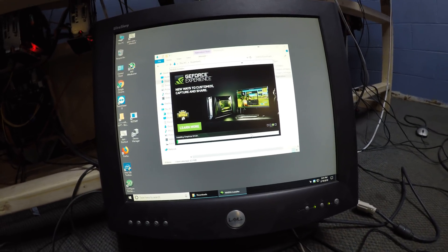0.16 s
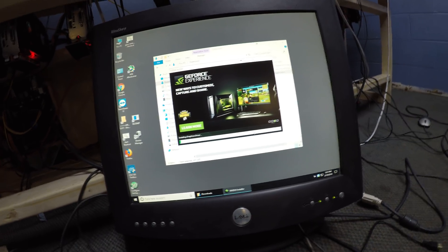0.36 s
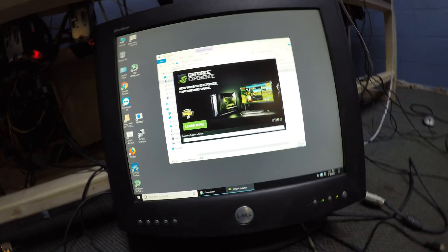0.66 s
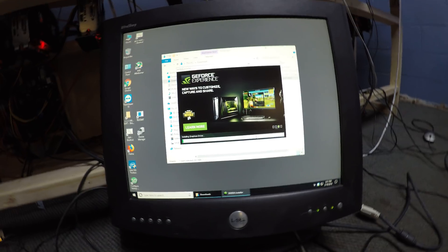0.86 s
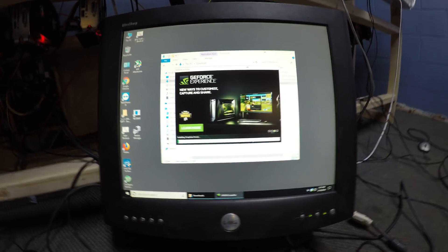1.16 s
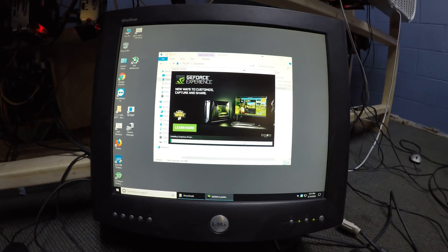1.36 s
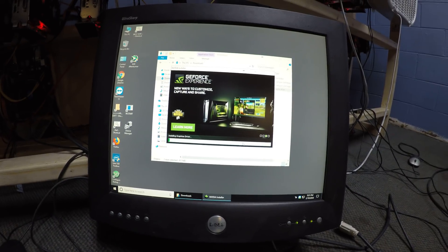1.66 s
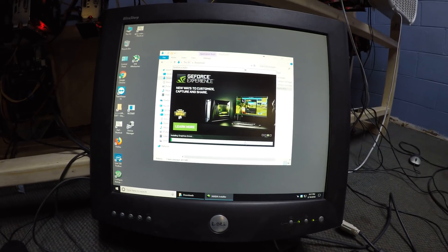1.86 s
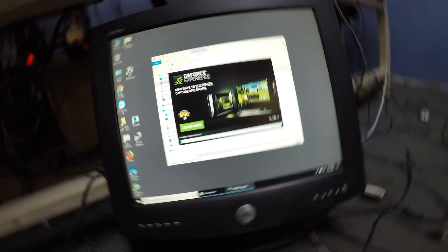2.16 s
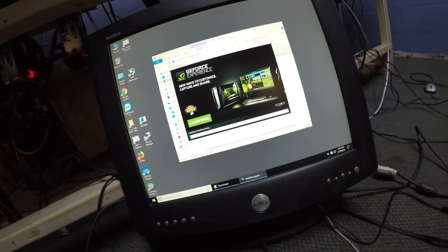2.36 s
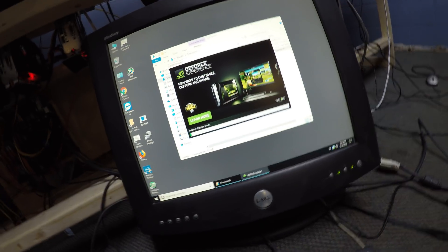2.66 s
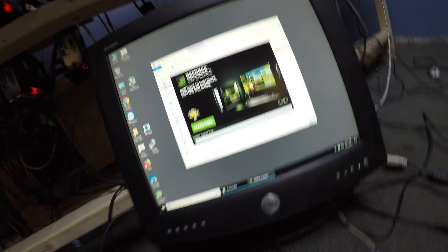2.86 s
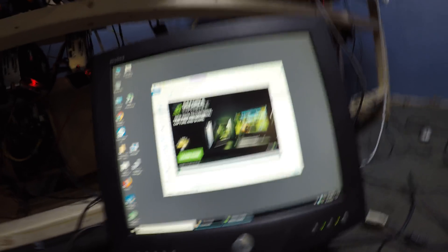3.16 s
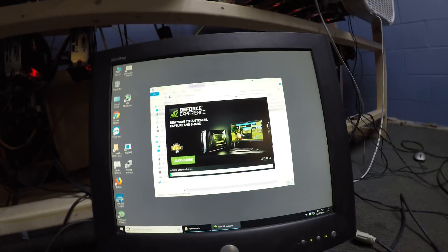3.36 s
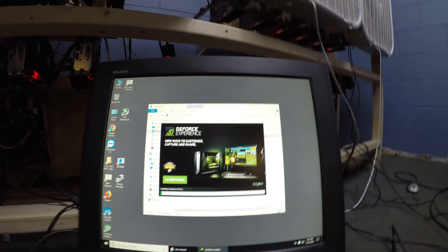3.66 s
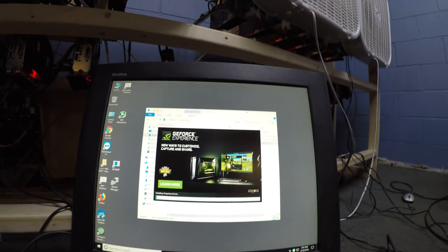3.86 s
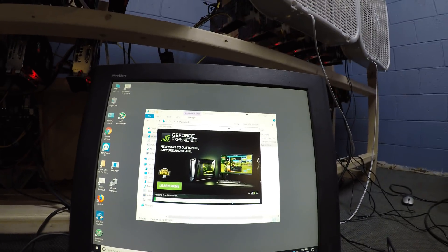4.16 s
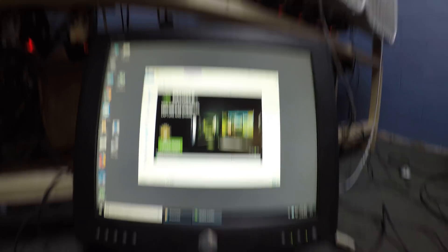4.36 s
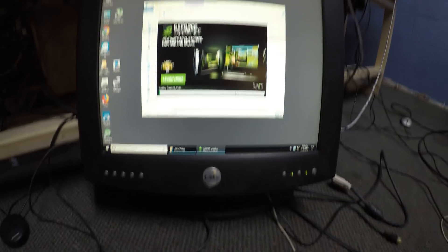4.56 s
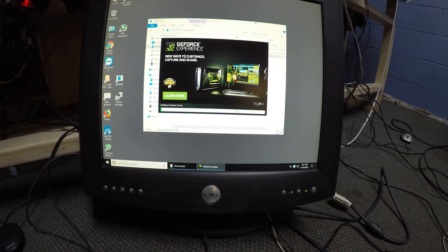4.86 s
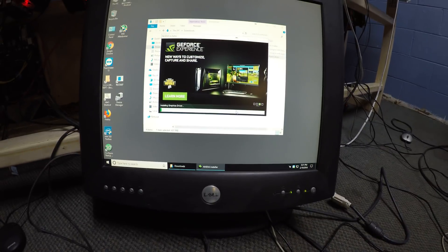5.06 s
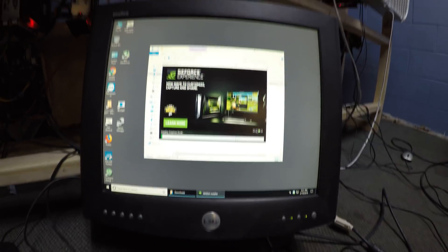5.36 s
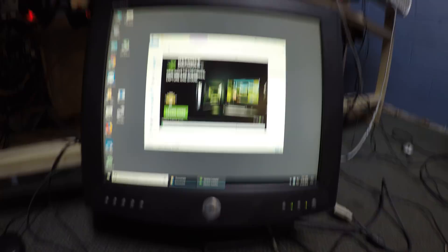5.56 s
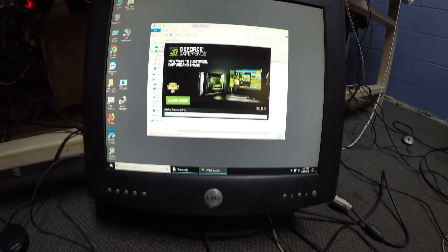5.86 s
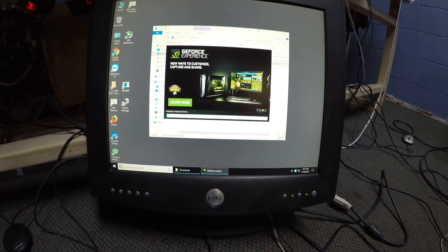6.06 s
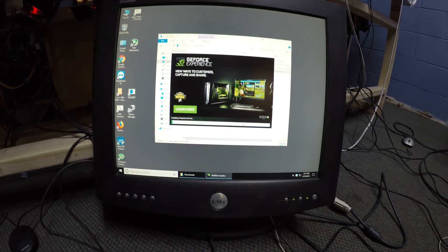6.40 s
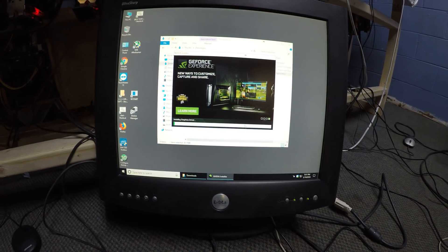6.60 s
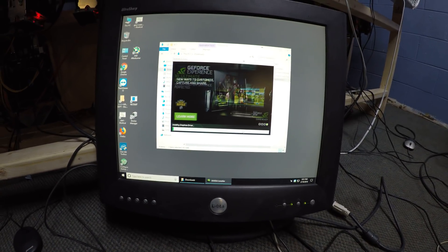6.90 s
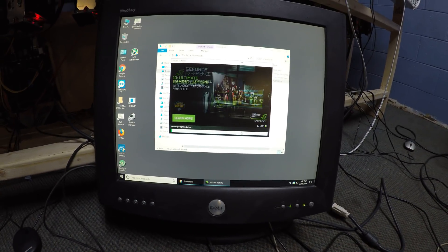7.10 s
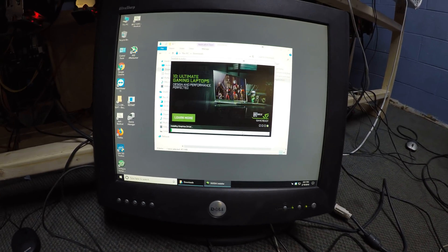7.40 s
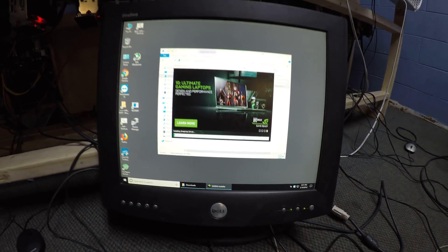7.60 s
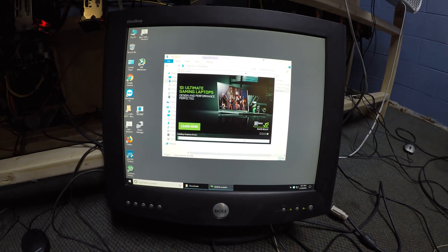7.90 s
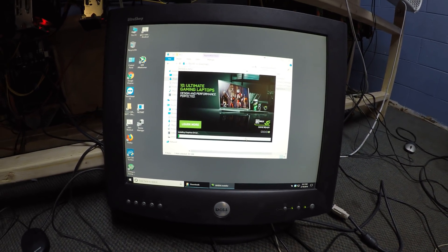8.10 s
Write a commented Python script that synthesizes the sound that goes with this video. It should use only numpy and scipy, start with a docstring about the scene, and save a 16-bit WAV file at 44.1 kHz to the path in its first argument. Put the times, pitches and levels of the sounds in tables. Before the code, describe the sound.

From 0 to about 8.2 seconds, many computer cooling fans and large box fans run constantly in a hard-walled room. A low hum, strongest around 70 to 150 hertz, beats and throbs gently under a smooth, slightly breathing roar. Over it lies a steady, bright rush of air through narrow passages. Four small fans whine thinly, with fundamentals near 1.5 to 2 kilohertz and higher multiples around 4 to 6 kilohertz, swelling, fading and bending slightly in pitch. A small handheld device picks this up nearly identically on both sides, with faint separate top hiss. Brief, dull handling bumps fall near 1.3, 1.8 (weakest), 2.9, 3.2, 3.5, 3.7, 4.8, 5.6 and 6.0 seconds, the last two strongest. Afterwards only fan noise remains, ending without any slowdown.

```python
"""A rack of computers and box fans in a hard-walled room, heard by two ports of a small hand-held device.
From start to end big blades hum as beating sines, and air roars and rushes as shaped noise;
four small fast fans whine as multiples of rotor speeds that rise and fall throughout.
Between 1.3 and 6 s the hand bumps the housing nine times, each a quick push and a weaker swing back.
Each port adds its own faint top hiss of shaped noise all along."""
import sys
import numpy as np
from scipy import signal
from scipy.fft import rfft, irfft, next_fast_len
from scipy.io import wavfile
from scipy.ndimage import uniform_filter1d

SR = 44100
rng = np.random.default_rng(int(sys.argv[2]) if len(sys.argv) > 2 else 0)


def volts(x):
    """Linear amplitude factor 10**(x/20) for a level x in dB, scalar or array-like."""
    e = np.asarray(x, float) / 20
    return 10 ** e


def unload_wav(signal):
    """Save mono or channel-first audio to the path in sys.argv[1] as 16-bit WAV at rate SR, clipped to [-1, 1]."""
    wavfile.write(
        sys.argv[1],
        SR,
        np.round(np.clip(np.atleast_2d(signal).T, -1, 1) * 32767).astype(np.int16),
    )


N = 363384

# small whining fans, by name: rest_hz, settling_s, louder_db_per_hz of speed-up
ROTORS = {"a": (2010.2, .28, 0), "b": (1927.7, .2, 0), "c": (1524, .26, -.75), "d": (1873, .15, 0)}


def time():
    """Uniform sampling: the instant of every sample in seconds."""
    return np.arange(N) / SR


def walk(rate):
    """Slow random modulation: levels held 1 / rate s, smoothed by two running means; spread near 1."""
    hold = max(int(SR / rate), 1)
    steps = np.repeat(rng.standard_normal(N // 500), hold)[:N + hold]
    once = uniform_filter1d(steps, hold)
    return 1.3 * uniform_filter1d(once, hold)[:N]


def tone(hz):
    """Frequency modulation: phase is the running sum of a pitch curve; a sine of rms 1."""
    turns = np.cumsum(hz) / SR + rng.random()
    return np.sqrt(2) * np.sin(2 * np.pi * turns)


def colour(hz, density_db, resonances=()):
    """Spectral shaping: white noise is given a density in dB per Hz, lifted or cut at each resonance."""
    size = next_fast_len(N)
    f = np.maximum(np.arange(size // 2 + 1) * SR / size, 1)
    lift_db = sum(db / (1 + (2 * (f - centre) / width) ** 2) for centre, width, db in resonances)
    shape_db = np.interp(np.log(f), np.log(hz), density_db) + lift_db
    gain = volts(shape_db) * np.sqrt(SR / 2)  # white noise spreads its power over SR / 2
    return irfft(rfft(rng.standard_normal(size)) * gain, size)[:N]


def hum():
    """Beating: close tones interfere, while each drifts a little in speed and swells as the inflow shifts."""
    # steady tones of big fan shafts, blades and mains: pitch_hz, level_db
    tones = [(46.8, -56), (58.9, -53.5), (71.3, -44.5), (72.7, -44), (77.7, -47), (117.8, -44.5),
             (120, -42.5), (143, -43), (145.3, -38), (154.8, -48), (197.8, -48.5), (235.5, -54),
             (239.9, -52.5), (303.8, -52), (304.8, -53), (308.9, -55), (360, -63), (385.6, -58.5),
             (387.9, -63), (418.9, -68), (935, -70)]
    total = np.zeros(N)
    for pitch_hz, level_db in tones:
        swell = volts(level_db + 2.32 * walk(4))
        drift = 1 + 0.002023 * walk(2.5)
        total += swell * tone(pitch_hz * drift)
    return total


def roar():
    """Turbulence: the flow of many big fans sums to a smooth low noise that breathes in level."""
    # low roar, lifted by room modes: frequency_hz, density_db per Hz
    roar_curve = [(15, -61), (60, -61), (100, -60), (113, -55.5), (146, -50.5), (165, -61), (190, -59.5),
                  (212, -53.5), (228, -64.5), (240, -60.5), (253, -70), (285, -63), (335, -71),
                  (400, -70.5), (450, -81), (520, -91.5)]
    noise = colour(*np.transpose(roar_curve + [(700, -130)]))
    return noise * volts(0.36 * walk(2.59))


def rush():
    """Turbulence in narrow passages: duct resonances and echo dips colour noise steadier than the roar."""
    # small fans and fins, with dips of nearby echoes: frequency_hz, relative_density_db per Hz
    rush_curve = [(260, -31), (450, -12.5), (494, -9.5), (558, -19), (802, -8), (1110, -18.5), (1250, -9),
                  (1430, -5), (1490, -3.5), (1730, -11), (1980, -11), (3340, -15.5), (4430, -6), (5870, -6),
                  (6280, -10), (7480, -25.5), (11200, -35.5), (14600, -64), (22000, -120)]
    # small resonances and dips of ducts and fins: centre_hz, width_hz, lift_db
    ducts = [(474, 41, 4), (540, 38, -5.5), (580, 30, -4), (625, 69, 2.5), (950, 73, 2), (1040, 60, -3),
             (1136, 50, -4), (2550, 1400, 1), (3520, 220, -2.5), (4240, 90, 0.5), (4500, 130, 1),
             (4960, 110, 3), (5400, 200, 2), (6080, 130, 2), (6380, 160, 4.5)]
    noise = colour(*np.transpose(rush_curve), ducts)
    level_db = -39 + .25 * walk(1.5)
    return noise / noise.std() * volts(level_db)


def speed_up(fan):
    """Rotor inertia: pitch in Hz over rest follows each change of drive, and its end, with an exponential lag."""
    # spells of faster or slower drive, by fan: start_s, length_s, pitch_change_hz aimed at
    spells = {"a": [(-1, 1, 14), (1.8, .24, 23), (3.85, .33, 19), (5.33, .58, 21)], "b": [(-1, 1.25, 7.5),
              (1.35, .45, 8), (5.25, 3.1, 12)], "c": [(1.72, .62, -7.5), (3.35, .65, -2.5), (4.0, .3, -7),
              (5.5, .4, -6), (5.9, .3, -4.5), (6.2, .52, -6), (7.2, 1.1, 1)], "d": [(-1, 2.05, 10),
              (3.5, .45, 31), (3.95, .55, 15), (4.65, .65, -13)]}
    settling_s = ROTORS[fan][1]

    def follow(start_s):
        return 1 - np.exp(-np.maximum(time() - start_s, 0) / settling_s)

    return sum(change_hz * (follow(start_s) - follow(start_s + length_s))
               for start_s, length_s, change_hz in spells[fan])


def whine(fan):
    """Harmonic series: multiples of one rotor share its wavering speed but flutter apart; one row each."""
    # level curve of each multiple of the pitch, by fan and multiple: time_s, level_db
    levels = {"a": {1: [(0, -69), (.7, -57.5), (2, -59), (2.35, -68), (2.6, -60), (3.7, -59), (4.0, -64),
              (4.4, -62), (5.2, -60), (5.4, -62), (5.8, -53.5), (6.2, -62), (6.6, -56.5), (8.24, -59)],
              2: [(0, -65), (.5, -57), (1.3, -64), (1.7, -78), (2.3, -61), (2.8, -63), (3.2, -57),
              (3.7, -70), (4.5, -63), (5.0, -62), (5.4, -70), (6.0, -68), (6.6, -52.5), (7.3, -55.5),
              (7.9, -50), (8.24, -56)], 3: [(0, -58), (.8, -51.5), (1.6, -51), (2.35, -58), (3, -52),
              (3.8, -55), (4.3, -58), (4.7, -53), (7.2, -53), (7.8, -50.5), (8.24, -56)], 6: [(0, -96),
              (1.2, -81), (1.9, -86), (2.2, -95), (2.6, -78), (3.2, -78), (3.9, -92), (4.8, -92),
              (5.8, -83), (6.2, -100), (6.6, -100), (6.9, -88), (7.4, -86),
              (8.1, -85)]}, "b": {1: [(.3, -56.5), (1, -64), (1.8, -57), (2.1, -64), (4.8, -64), (5.9, -56),
              (7.4, -70), (7.8, -60)], 3: [(0, -55), (1, -54.5), (3.3, -62), (3.9, -57), (5.3, -61),
              (6, -70), (6.7, -58), (7.8, -54), (8.24, -50)]}, "c": {1: [(0, -49), (4.3, -50.5),
              (4.9, -50.5), (8.24, -49)]}, "d": {1: [(.7, -63), (1.3, -70), (3.6, -70), (3.9, -78),
              (4.5, -65), (5.4, -67), (6.3, -64), (6.8, -77), (7.2, -66)], 3: [(1.1, -58.5), (1.55, -72),
              (2.4, -59), (3.3, -63), (4.0, -49), (4.5, -66), (6.2, -66), (7, -57), (7.8, -72),
              (8.24, -65)]}}
    rest_hz, _, louder_db_per_hz = ROTORS[fan]
    extra_hz = speed_up(fan)
    waver = (.0002 + .000015 * np.abs(extra_hz)) * walk(12)  # grows away from rest
    pitch_hz = (rest_hz + extra_hz) * (1 + waver)
    rows = []
    for multiple, curve in levels[fan].items():
        level_db = np.interp(time(), *np.transpose(curve))
        flutter_db = 0.99 * walk(8.6)
        loudness = volts(level_db + louder_db_per_hz * extra_hz + flutter_db)
        rows.append(loudness * tone(multiple * pitch_hz))
    return rows


def bumps():
    """Impulse and recoil: a quick push of the housing, then an equally quick, weaker swing back."""
    # bumps of the hand on the housing: time_s, peak_db, width_s
    knocks = [(1.313, -21.5, 0.0024), (1.824, -32, 0.0021), (2.922, -23, 0.0026), (3.216, -24, 0.003),
              (3.47, -23, 0.0037), (3.655, -23, 0.0016), (4.781, -22, 0.0019), (5.604, -19, 0.003),
              (5.993, -17.5, 0.0019)]
    out = np.zeros(N)
    for time_s, peak_db, width_s in knocks:
        x = (time() - time_s) / width_s
        push = np.exp(-x ** 2 / 2)
        swing_back = 0.51 * np.exp(-((x - 3.2) / 1.0) ** 2 / 2)
        out += volts(peak_db) * (push - swing_back)
    return out


def hiss():
    """Uncorrelated noise: each port has its own top hiss, and both flicker together in level."""
    # hiss of the two ports: frequency_hz, left_density_db per Hz, right_density_db per Hz
    hiss_curve = [(11150, -135, -135), (11340, -106, -106), (11840, -101, -99), (12200, -96, -95.5),
                  (12450, -101, -91), (12800, -101, -99), (13200, -99, -97), (14100, -103, -102),
                  (15000, -106, -106), (16500, -112, -112)]
    hz, *ports = np.transpose(hiss_curve)
    noise = np.array([colour(hz, density_db) for density_db in ports])
    return noise * volts(.6 * walk(9))


def scene():
    """Superposition: both ports hear the same room; only the top hiss and the highest whine differ."""
    # gain of the highest whine at each port: left_db, right_db
    top_pan_db = (-4, 5)
    *whines, top = whine("a")
    whines += whine("b") + whine("c") + whine("d")
    both_ports = hum() + roar() + rush() + sum(whines) + bumps()
    panned_top = volts(np.array(top_pan_db))[:, None] * top
    return both_ports + hiss() + panned_top


def top_cut(x):
    """Nothing passes above the cut-off."""
    return signal.sosfilt(signal.butter(12, 15190, fs=SR, output="sos"), x)


def record(dry):
    """Stereo pickup: the signals of the two ports make the finished mix, one channel each."""
    return top_cut(dry)


dry = scene()
out = record(dry)
unload_wav(out)
```